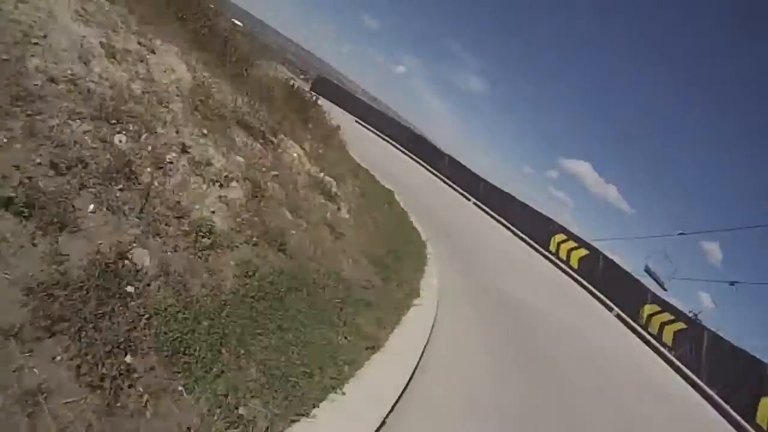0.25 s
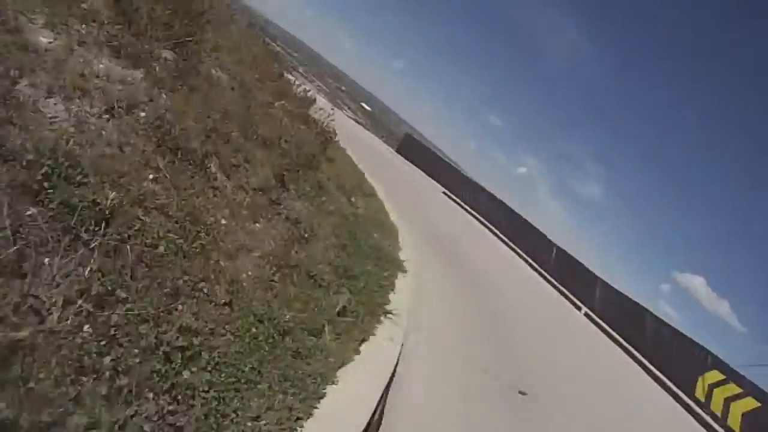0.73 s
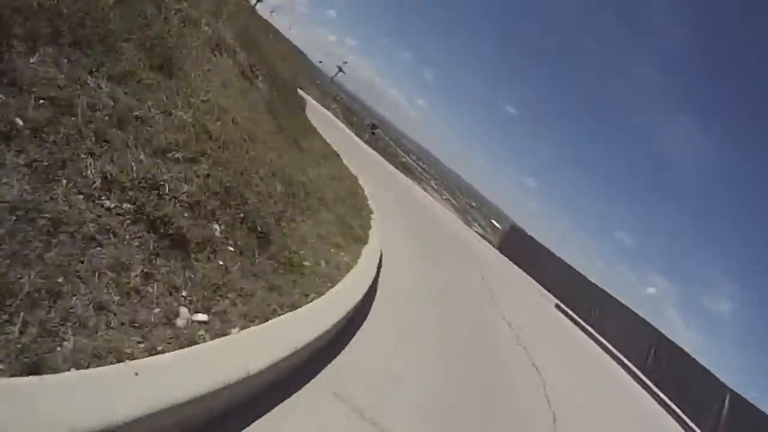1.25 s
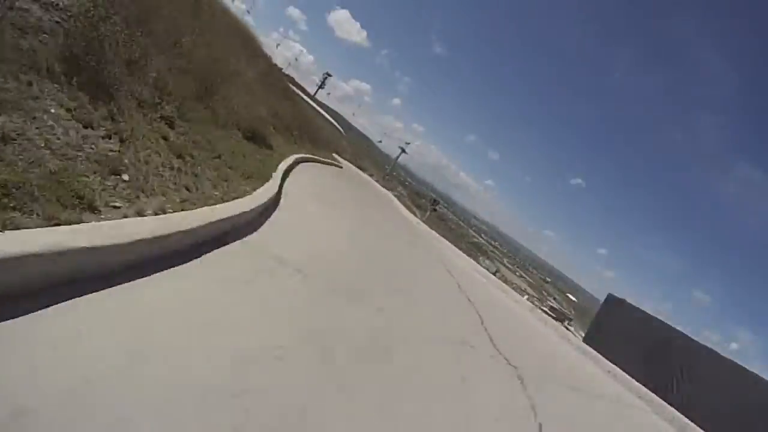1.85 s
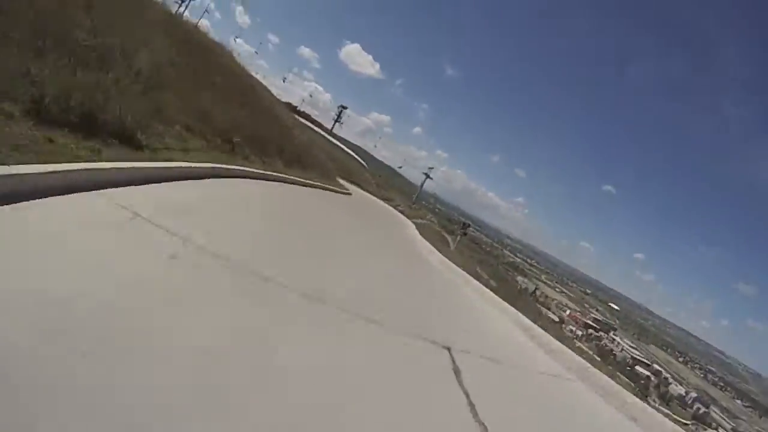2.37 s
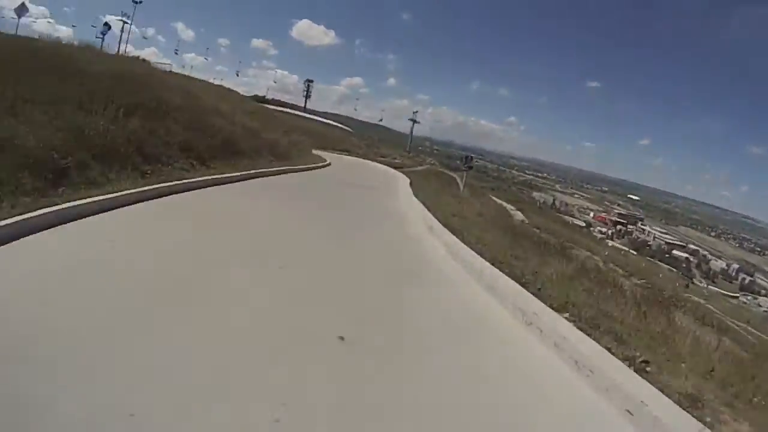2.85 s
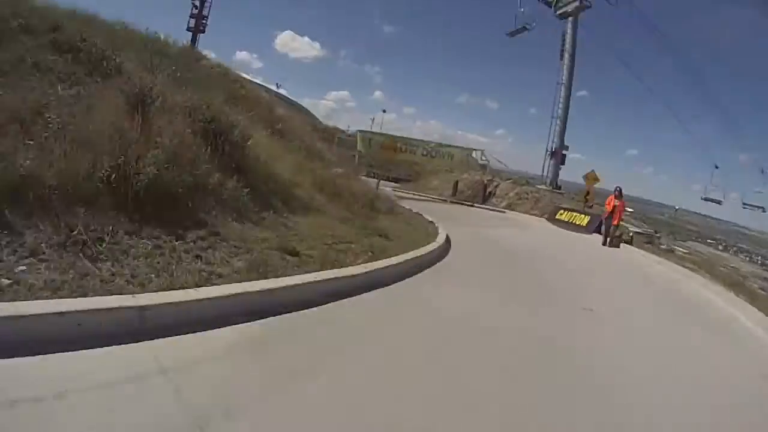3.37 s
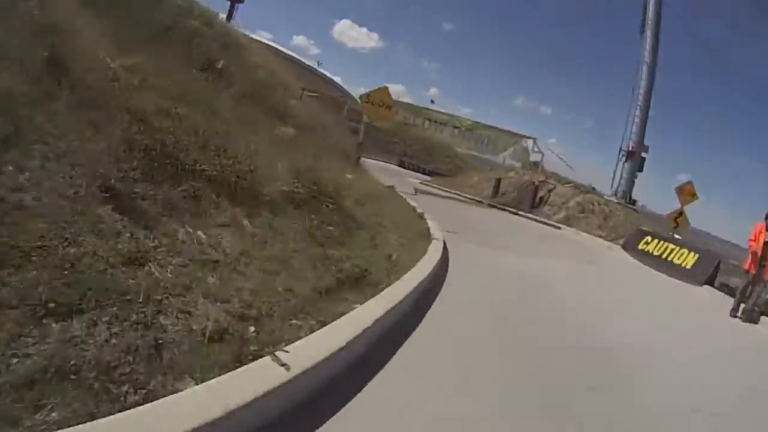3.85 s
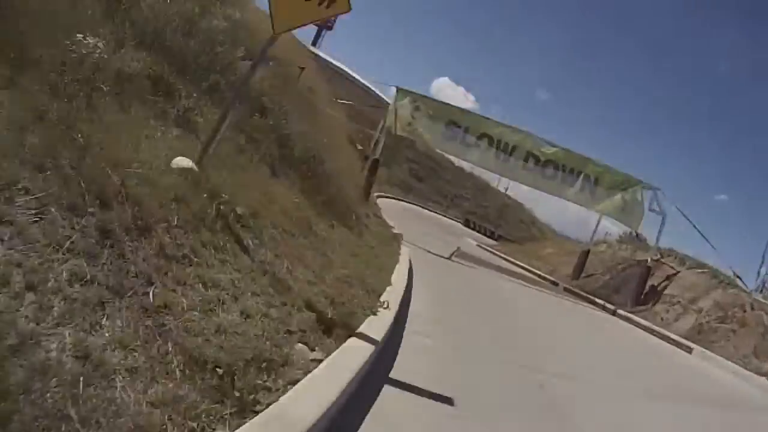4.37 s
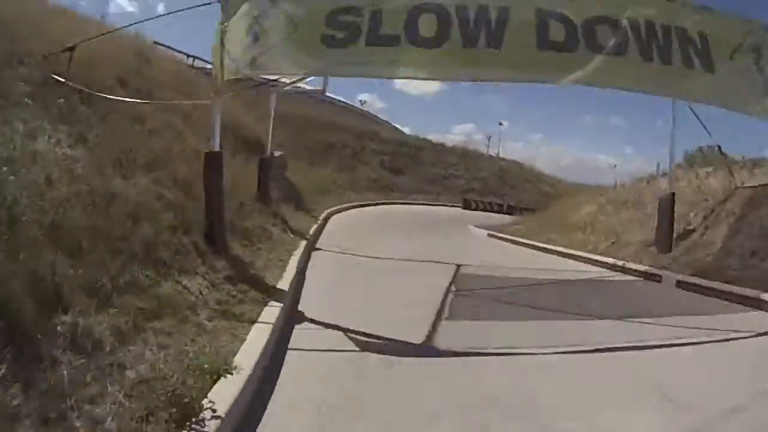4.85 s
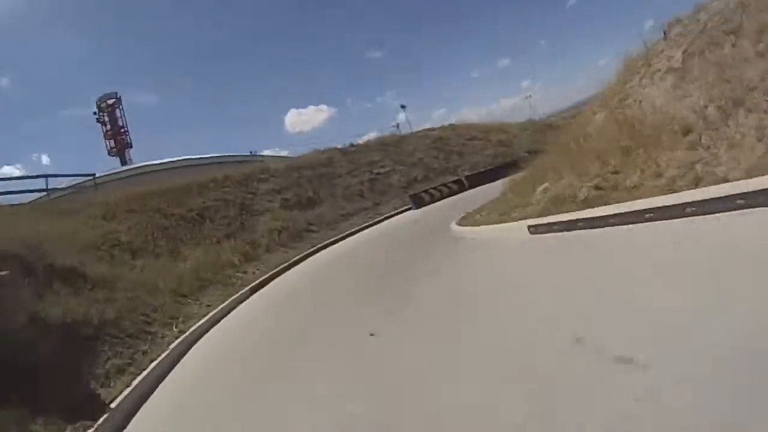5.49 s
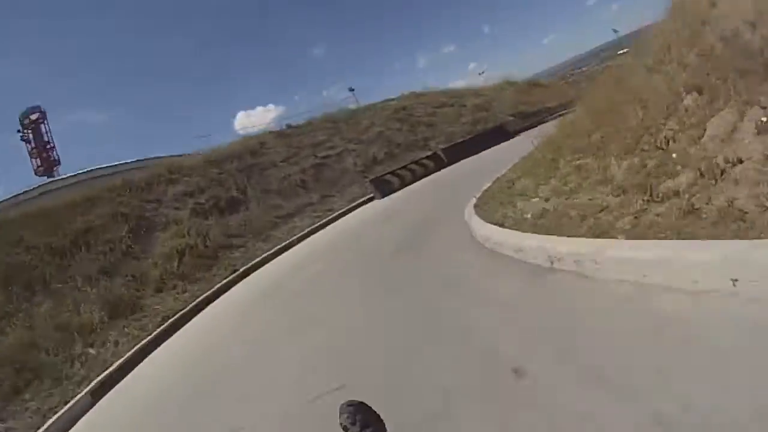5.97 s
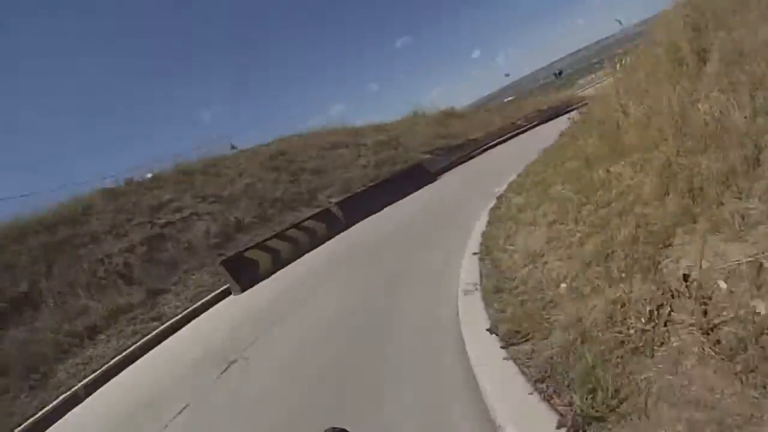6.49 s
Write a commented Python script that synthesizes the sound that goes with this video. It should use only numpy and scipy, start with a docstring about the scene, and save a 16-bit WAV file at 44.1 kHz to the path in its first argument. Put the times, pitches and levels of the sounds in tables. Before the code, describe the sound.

Loud wheeled sled rumble on a concrete track, with knocks, rattles and wind buffeting, turning to a rasping howl and squeal.

```python
"""Plastic sled on a concrete track

A sled on small wheels runs fast downhill, heard from the rider's seat. Rough concrete drums the
wheels and makes the hollow shell boom. Grit crackles and pings the metal parts, cracks jolt the
sled, and wind buffets the microphone. From about 5 s the sled slows for a corner, scrubbing over
the concrete in several pushes that rasp, howl and finally squeal."""
import sys
import numpy as np
from scipy import signal
from scipy.fft import rfft, irfft, next_fast_len
from scipy.io import wavfile
from scipy.ndimage import uniform_filter1d, map_coordinates

SR = 44100
rng = np.random.default_rng(int(sys.argv[2]) if len(sys.argv) > 2 else 0)


def wav_out(sig):
    """Save sig, one row per channel (or a flat mono array), as 16-bit PCM at SR to the path in sys.argv[1]."""
    wavfile.write(sys.argv[1], SR, np.round(np.clip(np.atleast_2d(sig).T, -1, 1) * 32767).astype(np.int16))


N = 296784

# How hard the track drums the wheels. Each row: time in seconds, relative level in dB.
ROAR_LEVEL = [(0.0, -16), (0.8, -16.0), (1.0, -17.5), (1.54, -15.5), (1.76, -18.5), (1.92, -14), (2.0, -20),
              (2.26, -15), (2.48, -20), (2.88, -14), (3.1, -18.0), (3.44, -13.5), (3.5, -18), (3.7, -13.5),
              (3.82, -20), (3.9, -17), (4.6, -16), (4.83, -21.5), (4.93, -16.5), (5.0, -14), (5.94, -15),
              (6.0, -18), (6.72, -14.5)]
# Rough stretches of concrete. Each row: start in seconds, length in seconds, boost in dB.
ROUGH_PATCHES = [(0.145, 0.025, 3), (0.608, 0.1, 2.5), (1.438, 0.047, 2.5), (2.823, 0.079, 1.86),
                 (3.875, 0.045, 3.5), (4.15, .05, 2.5), (4.566, 0.054, 3), (4.954, .075, 3),
                 (5.128, .11, 3), (5.858, 0.035, 3.5), (6.294, 0.039, 4.5)]
# The tone of the rolling wheels and of the rattling fittings. Each row: frequency in Hz, gain in dB.
ROAR_COLOUR = [(110, -18.5), (240, -2.5), (350, -5.5), (450, -1.5), (540, -3), (640, 0.5), (770, -2.5),
               (880, -10), (1050, -23.5), (1400, -30.5), (2200, -42), (2600, -51.5), (5000, -72),
               (9000, -105)]
RATTLE_COLOUR = [(500, -17), (1000, 8.5), (1250, 3), (1470, 4.5), (1630, -7), (1800, 0.5), (1950, -5),
                 (2200, -0.5), (2550, -20), (2740, -9), (2920, -24), (3110, -16.5), (3500, -24.5),
                 (6000, -42.5), (10000, -70)]
# The notes the hollow shell rings at. Each row: pitch in Hz, width in Hz, gain in dB.
SHELL_MODES = [(158, 18, -4), (178, 20, 0), (222, 36, -9), (288, 50, -13)]
# How strongly the shell booms. Each row: time in seconds, level in dB.
BOOM_LEVEL = [(0, -15), (0.15, -16.5), (0.82, -17.5), (1.35, -20), (1.6, -24), (1.72, -19), (2.0, -27),
              (2.12, -19.5), (2.55, -28), (2.72, -14.5), (3.08, -17.5), (3.2, -19), (3.85, -23),
              (3.94, -14.5), (4.05, -22), (4.6, -18), (4.7, -22.5), (5.2, -26.5), (5.62, -32),
              (5.72, -25.5), (6.0, -28.5), (6.2, -23.5), (6.72, -22)]
# The boom's higher tone. Each row: frequency in Hz, gain in dB.
HIGH_BOOM_COLOUR = [(120, -6), (165, -2.5), (215, 2.5), (290, 2.5)]
# How much of that tone is used. Each row: time in seconds, share from 0 to 1.
HIGH_BOOM_SHARE = [(0.6, 0.59), (1.7, .1), (3.1, 0.053), (3.5, 0.72), (4.5, .55), (5.0, 0.8)]

# Hard scrubbing pushes, the light drag between them, and the bursts of squeal.
# Each row: start in seconds, length in seconds, relative level in dB.
SCRUB_PUSHES = [(4.965, 0.032, -37.5), (5.07, 0.23, -41.3), (5.35, 0.32, -36.5), (5.76, 0.1, -48),
                (5.86, 0.34, -41), (6.37, 0.66, -39.5), (6.46, 0.061, -39)]
LIGHT_DRAG = [(5.0, 1.1, -44.5)]
SQUEAL_BURSTS = [(5.93, .07, -42), (6.1, .08, -46), (6.43, .3, -37.5), (6.46, .045, -35)]
# The tone of the rasp and of the hiss drawn from it. Each row: frequency in Hz, gain in dB.
RASP_COLOUR = [(400, -20.5), (800, 21.5), (1100, 10.5), (1450, -2), (1700, -1), (2250, -1), (2500, -5),
               (3600, -10.5), (4050, -15), (4600, -15.5), (5600, -19), (6900, -29), (8100, -27.5),
               (8800, -47), (9700, -37), (14000, -50)]
HISS_COLOUR = [(1500, -18.5), (3300, -2.5), (5500, -5.5), (8000, -16)]
# The notes of slipping wheels. Each row: pitch in Hz, relative level in dB.
CHIRP_MODES = [(1480, -17.5), (1800, -21), (2220, -18.5)]
# The wandering notes of the howl and the squeal. Each row: time in seconds, pitch in Hz.
HOWL_NOTES = [(5.0, 680.5), (5.2, 750), (5.5, 780.7), (5.6, 713.4), (5.9, 703), (6.1, 729.5), (6.44, 726),
              (6.51, 689.4), (6.6, 725), (6.72, 677)]
SQUEAL_NOTES = [(6.0, 2270), (6.11, 2390), (6.17, 2170), (6.46, 2160), (6.51, 1950), (6.58, 1970),
                (6.63, 2080), (6.7, 1960), (6.73, 2000)]

# Cracks and joints under the wheels. Each row: time in seconds, kick in dB, clack strength in dB.
TRACK_CRACKS = [(0.14, 3.5, -33), (0.209, 4.5, -31), (0.429, 6.5, -46), (0.634, -0.5, -44),
                (0.829, 6.5, -39), (1.252, 1.5, -43), (1.346, 4, -45), (1.503, 6, -44), (1.546, 4.5, -39),
                (1.645, 7.5, -43), (1.821, 4.5, -38.5), (1.919, 6.5, -42), (2.228, 1.5, -33),
                (2.384, 2, -42), (2.56, 5, -34), (2.682, 2, -39.5), (2.947, 4.5, -42), (3.139, 5.5, -38),
                (3.367, 5, -45), (3.524, 6.5, -48), (3.668, 4, -48), (3.731, 2.5, -42), (4.333, 4, -37),
                (4.552, 5.5, -31.5), (4.723, 7.5, -43), (5.251, 6.5, -36), (5.288, 7, -39),
                (5.681, 3.5, -32), (5.81, 3.5, -34), (5.862, 2.5, -38), (6.693, 1, -37)]
# The tone of a landing's knock, the fittings' clack and a thump. Each row: frequency in Hz, gain in dB.
KNOCK_COLOUR = [(130, -21), (300, -7.5), (620, 1), (790, 0.5), (1050, -24), (2500, -59.5), (6000, -95.5)]
CLACK_COLOUR = [(600, -12.5), (1100, 16), (1500, 14.5), (2250, 3.5), (2600, -4), (5000, -15.5), (9000, -40)]
THUMP_COLOUR = [(20, -8.5), (60, 4), (270, 0.5), (450, -11), (1500, -54), (6000, -110)]
# Dull thumps: steps between slabs, and one more that comes with the dry tick at 3.2 s. Each row: time in
# seconds, peak level in dB.
DULL_THUMPS = [(2.243, -14.5), (3.196, -9), (4.925, -13), (5.075, -2.5)]
# Small crests where the sled goes light. Each row: time in seconds, level change in dB.
CREST_DIPS = [(0.4, -3), (0.99, -3.5), (1.284, -4), (2.2, -3), (2.33, -0.5), (3.81, 0), (4.665, -4),
              (5.1, -0.5), (5.323, -5.5), (6.58, -3)]

# Sand under the wheels. Each row: time in seconds, relative level in dB.
SAND_LEVEL = [(0, -51), (0.17, -54), (0.3, -54.5), (0.78, -57), (1.0, -56.5), (1.9, -59), (2.48, -63),
              (2.8, -60.5), (3.8, -60.5), (4.3, -56.5), (4.6, -55), (4.76, -62), (4.92, -62)]
# Little heaps of sand. Each row: start in seconds, length in seconds, boost in dB.
SAND_HEAPS = [(0.072, .008, 1), (0.145, 0.04, 3.5), (0.325, 0.017, 3.5), (0.374, .006, 4), (0.6, .025, 2.5),
              (0.685, .025, 2.5), (0.753, 0.013, 6), (1.062, .045, 4), (1.303, 0.012, 5.5),
              (1.413, 0.049, 2.5), (1.837, 0.054, 3.5), (2.555, .012, 5), (3.67, .008, 5), (3.9, 0.05, 4),
              (4.087, .008, 1), (4.16, 0.023, 5), (4.34, .015, 2), (4.609, 0.0072, 2), (4.883, .004, 7)]
# The tone of coarse grit and of the finest sand. Each row: frequency in Hz, gain in dB.
GRIT_COLOUR = [(1500, -17), (2500, -7.5), (3050, -2), (3600, -9), (4350, 5), (5300, 0), (6650, -2),
               (7200, -11.5), (8150, -9), (8750, -24.5), (11400, -32), (15000, -50.5)]
FIZZ_COLOUR = [(5000, -34.5), (8750, -4), (9400, -2), (11400, -2), (12500, -6), (13600, -7), (15000, -18.5)]
# The notes of the metal parts. Each row: pitch in Hz, seconds to fade by 60 dB, relative level in dB.
METAL_MODES = [(4450, .03, 0), (5150, .02, -2), (5800, .06, -4), (6600, .028, -1), (8170, .04, -7),
               (13400, .02, -14)]
# Hard grains hitting the metal. Each row: time in seconds, strength in dB, pitch in Hz.
GRAIN_PINGS = [(0.0233, -38, 5670), (0.0732, -38, 5790), (0.1585, -30, 6320), (0.2084, -38, 6440),
               (0.341, -35, 5560), (0.5985, -35, 5770), (0.7547, -39, 6160), (0.82, -37, 6750),
               (1.0705, -32, 5820), (1.2979, -41, 5810), (1.485, -38, 6640), (1.7973, -45, 6600),
               (2.3645, -43, 6800), (2.5461, -48, 6350), (4.0871, -46, 6200), (4.2782, -31, 5830),
               (4.361, -36, 5850), (4.4727, -36, 5840), (4.554, -32, 6640)]

# Steady air over the microphone. Each row: time in seconds, relative level in dB.
WIND_LEVEL = [(0, -26.5), (1.15, -35.5), (1.7, -33), (2.6, -28.5), (3.1, -39.5), (3.25, -26.5), (4.0, -29),
              (5.45, -30.5), (6.0, -32), (6.72, -28.5)]
# Wind gusts and a faint sizzle. Each row: start in seconds, length in seconds, relative level in dB.
WIND_GUSTS = [(0.05, 0.052, -27), (1.72, 0.05, -25), (1.85, 0.036, -22.5), (2.21, .08, -24),
              (2.43, .08, -30.5), (3.16, 0.095, -24.5), (4.3, 0.24, -25), (4.8, 0.21, -24.5),
              (5.0, 0.23, -29.5), (5.67, 0.19, -25.5)]
SIZZLE_BURSTS = [(2.72, .33, -62.5)]
# One dry tick. Its row: time in seconds, strength in dB.
DRY_TICK = [(3.1912, -22)]


def wheel_roar(load, jolt):
    """Rough concrete drums the wheels with tiny hits; they drum less once they slide."""
    slide_db, = curves([(4.7, 0), (4.86, -2.95)])
    hits = contacts(rate=2600, spread_db=1.5, smooth=0.68) * amp(1.33 * load + jolt)
    return amp(roar_level() + 0.5 + slide_db) * unit(coloured(hits, ROAR_COLOUR))


def rattle(load, jolt):
    """The fittings shake, louder where the track is rough or sandy."""
    ticks = contacts(rate=500, spread_db=2.5, smooth=.4)
    ticks *= amp(1.8 * load + 1.4 * chatter(rate=90, fade_s=.04) + .45 * jolt)
    return amp(0.63 * roar_level() + 0.43 * sand_level() - 5.5) * unit(coloured(ticks, RATTLE_COLOUR))


def shell_boom(load):
    """Hits from the track make the hollow shell ring, its tone shifting higher at times."""
    shell = resonate(contacts(rate=890, spread_db=1, smooth=0.68) * amp(load), SHELL_MODES)
    boom = unit(coloured(shell, [(90, -16), (150, 0.5), (300, 1), (700, -15), (2000, -49.5)]))
    boom_db, = curves(BOOM_LEVEL)
    high_share, = curves(HIGH_BOOM_SHARE)
    return amp(boom_db) * ((1 - high_share) * boom + high_share * coloured(boom, HIGH_BOOM_COLOUR))


def scrub(load, pressure):
    """Sliding rasps on the concrete and makes the wheels chirp; harder pushes hiss brighter."""
    scrapes = contacts(rate=4300, spread_db=5, smooth=0.49) * amp(1.1 * load + 2.1 * wobble(110))
    rasp = unit(coloured(scrapes, RASP_COLOUR))
    full_push = amp(-38)
    hiss = amp(-42) * (pressure / full_push) ** 2 * unit(coloured(rasp, HISS_COLOUR))
    chirps = 0
    for hz, db in CHIRP_MODES:
        tone = friction_tone(hz * (1 + 0.035 * wobble(16)), scatter_hz=99.2, flutter_db=2.5)
        chirps += amp(db) * tone * amp(1.3 * wobble(25))
    return amp(13) * pressure * (rasp + chirps) + hiss


def howl(pressure):
    """Rapid sticking and slipping makes a hoarse note that grows gently with the pressure."""
    hz, = curves(HOWL_NOTES)
    tone = friction_tone(hz * (1 + .012 * wobble(25)), scatter_hz=38, flutter_db=2.5)
    return amp(-5.5) * pressure ** 0.41 * tone


def squeal():
    """The slipping wheels squeal in thin bursts, with a softer note an octave above the howl."""
    squeal_hz, = curves(SQUEAL_NOTES)
    howl_hz, = curves(HOWL_NOTES)
    whine = friction_tone(squeal_hz, scatter_hz=75, flutter_db=3)
    octave = friction_tone(2 * howl_hz, scatter_hz=75, flutter_db=3)
    return (whine + amp(-6) * octave) * swells(SQUEAL_BURSTS, attack_s=0.04, release_db_per_s=403)


def knocks(clack_decay_s=0.018):
    """Landing after a crack knocks the wheels, harder where they roar, and clacks the fittings."""
    s, kick_db, clack_db = np.transpose(TRACK_CRACKS)
    roar_db, = curves(ROAR_LEVEL)
    knock = coloured(impulses(s, 35.5 + kick_db) * amp(roar_db), KNOCK_COLOUR)
    fade = np.exp(-np.arange(SR // 8) / SR / clack_decay_s)
    shake = signal.fftconvolve(impulses(s, clack_db), fade)[:N]
    return knock + coloured(shake * rng.standard_normal(N), CLACK_COLOUR)


def thumps():
    """Each step between slabs gives the whole sled one dull push; one more dull push comes with the dry tick at
    3.2 s."""
    s, peak_db = np.transpose(DULL_THUMPS)
    push = coloured(impulses(s, peak_db), THUMP_COLOUR)
    return amp(peak_db.max()) * push / np.abs(push).max()


def grit(load, jolt):
    """Sand grains crack under the wheels, hardest at each landing."""
    sand_db = sand_level()
    pressure = amp(1.3 * load + 2.3 * chatter(rate=60, fade_s=.035) + .4 * jolt)
    coarse = contacts(rate=2300, spread_db=2.5, smooth=0.49) * pressure
    fine = contacts(rate=1500, spread_db=-1, smooth=.5) * pressure * amp(1.8 * wobble(90))
    crackle = amp(sand_db + 4) * unit(coloured(coarse, GRIT_COLOUR))
    # The fizz needs the hardest contact, so it swells faster than the crackle.
    fizz = amp(1.575 * sand_db + 21) * unit(coloured(fine, FIZZ_COLOUR))
    return crackle + fizz


def metal_pings(ticks_per_s=16):
    """Flying grains hit the metal: a few hard pings, and light ticks that grow louder with more sand."""
    s, strength_db, hz = np.transpose(GRAIN_PINGS)
    pings = grain_hits(s, strength_db - 6.5, hz)
    sand_db = sand_level()
    for mode_hz, _, mode_db in METAL_MODES:
        at = rng.integers(0, N, int(ticks_per_s * N / SR))
        size, detune = rng.standard_normal((len(at), 2)).clip(-2, 2).T
        tick_db = sand_db[at] + 5.2 + mode_db + 2.5 * size
        pings += grain_hits(at / SR, tick_db, mode_hz * (1 + .015 * detune))
    return pings


def grain_hits(s, db, hz, attack_s=.0006, crack_decay_s=.004):
    """Each grain gives a dry crack and briefly rings two close metal notes that beat together."""
    mode_hz, mode_fade_s, _ = np.transpose(METAL_MODES)
    t = np.arange(SR // 12) / SR
    detune = rng.uniform(.005, .04, (len(s), 1))
    phase = 2 * np.pi * hz[:, None] * t
    fade_s = np.interp(hz, mode_hz, mode_fade_s)[:, None]
    envelope = amp(-60 * t / fade_s) * (1 - np.exp(-t / attack_s))
    rings = envelope * (np.sin(phase) + .5 * np.sin(phase * (1 - detune)))
    cracks = amp(1.5) * np.exp(-t / crack_decay_s) * rng.standard_normal(phase.shape)
    # Add every hit in at its own start time.
    at = (np.round(s * SR).astype(int)[:, None] + np.arange(len(t))).ravel()
    ring, crack = (np.bincount(at, (amp(db)[:, None] * part).ravel(), N)[:N] for part in (rings, cracks))
    return ring + coloured(crack, GRIT_COLOUR)


def wind():
    """Air tumbles over the microphone in lumps, making a low rumble."""
    steady_db, = curves(WIND_LEVEL)
    colour = [(8, -20), (20, -2.5), (35, 5.5), (70, 3), (120, 3), (250, 0), (800, -70)]
    rumble = unit(coloured(rng.standard_normal(N), colour) * amp(0.55 * wobble(11)))
    gusts = swells(WIND_GUSTS, attack_s=0.057, release_db_per_s=202)
    return amp(1.93) * np.hypot(amp(steady_db), gusts) * rumble


def sizzle_and_tick():
    """A thin, high sizzle on the straight, and a dry tick at 3.2 s."""
    hiss = resonate(rng.standard_normal(N), [(7600, 280, 0.015), (8220, 240, 0.92)])
    sizzle = unit(resonate(hiss, [(7840, 720, 0)]) * amp(2 * wobble(30)))
    tick = coloured(impulses(*np.transpose(DRY_TICK)), [(1000, 6), (4000, 2), (15000, -4)])
    return swells(SIZZLE_BURSTS, attack_s=.15, release_db_per_s=90) * sizzle + tick


def roar_level():
    """How hard the track drums, in dB, rough patches included."""
    return curves(ROAR_LEVEL)[0] + boosts(ROUGH_PATCHES, attack_s=0.01, release_db_per_s=502.5)


def sand_level():
    """How gritty the track is, in dB, heaps included."""
    return curves(SAND_LEVEL)[0] + boosts(SAND_HEAPS, attack_s=0.002, release_db_per_s=700.5)


def chatter(rate, fade_s):
    """A wheel skips over ripples: its load leaps at each landing, then relaxes."""
    landings = (rng.random(N) < rate / SR) * rng.uniform(0.23, 1, N)
    load = signal.fftconvolve(landings, amp(-60 * np.arange(SR // 8) / SR / fade_s))[:N]
    swing = unit(load - uniform_filter1d(load, size=SR // 12))
    return 2 * np.tanh(swing / 2)


def jolt_db(hang_s=.011, kick_s=.008):
    """A wheel hangs over each crack for an instant, then lands with a kick that dies away."""
    t = np.arange(-SR // 20, SR // 5) / SR
    shape = np.where(t < 0, -1.05 * np.exp(-np.abs(t) / hang_s), np.exp(-np.abs(t) / kick_s))
    db = np.zeros(N + SR)
    for s, kick_db, _ in TRACK_CRACKS:
        db[round(s * SR) - SR // 20:][:len(t)] += kick_db * shape
    return db[:N]


def crest_gain(half_length_s=0.025):
    """A volume curve that dips as the sled floats over each crest."""
    t = np.arange(N) / SR
    return amp(sum(db * np.exp(-((t - s) / half_length_s) ** 2) for s, db in CREST_DIPS))


def contacts(rate, spread_db, smooth):
    """Tiny hits of uneven size, `rate` a second, plus a `smooth` amount of plain noise."""
    struck = rng.random(N) < rate / SR
    sizes = rng.choice([-1, 1], N) * amp(spread_db * rng.standard_normal(N).clip(-2, 2))
    return unit(unit(struck * sizes) + smooth * rng.standard_normal(N))


def friction_tone(hz, scatter_hz, flutter_db):
    """A rubbing note whose pitch and strength tremble."""
    phase = 2 * np.pi * np.cumsum(hz + scatter_hz * wobble(300)) / SR
    return unit(np.sin(phase) * amp(flutter_db * wobble(160)))


def swells(rows, attack_s, release_db_per_s):
    """A volume curve from (start, length, dB) rows: each eases in, holds and dies away."""
    t = np.arange(N) / SR
    gains = []
    for s, length, db in rows:
        rise = np.sin(np.pi / 2 * np.clip((t - s) / attack_s, 0, 1)) ** 2
        gains.append(rise * amp(db - release_db_per_s * np.maximum(t - s - length, 0)))
    return np.linalg.norm(gains, axis=0)


def boosts(rows, attack_s, release_db_per_s):
    """Extra dB from (start, length, dB) rows, each swelling and fading."""
    return sum(db * swells([(s, length, 0)], attack_s, release_db_per_s) for s, length, db in rows)


def impulses(times, db):
    """One sharp blow at each time."""
    return np.bincount(np.round(times * SR).astype(int), amp(db), N)[:N]


def coloured(x, points):
    """Shape the tone of x with (Hz, dB) gains."""
    size = 2 * next_fast_len(N // 2 + SR // 4)
    hz, db = np.transpose(points)
    log_gain = np.log(amp(np.interp(np.log(np.fft.rfftfreq(size, 1 / SR) + 1), np.log(hz), db)))
    # Fold the filter so that it rings only after a hit, never before.
    cepstrum = irfft(log_gain, size)
    cepstrum[1:size // 2] *= 2
    cepstrum[size // 2 + 1:] = 0
    return irfft(rfft(x, size) * np.exp(rfft(cepstrum)), size)[:N]


def resonate(x, modes):
    """Let x ring at each (Hz, width in Hz, dB) note."""
    size = next_fast_len(N + SR // 2)
    f = np.fft.rfftfreq(size, 1 / SR)
    response = sum((-1) ** k * amp(db) * 1j * f * width / (hz * hz - f * f + 1j * f * width)
                   for k, (hz, width, db) in enumerate(modes))
    return irfft(rfft(x, size) * response, size)[:N]


def wobble(rate):
    """A smooth curve through `rate` random points a second."""
    return map_coordinates(rng.standard_normal(4096), [np.arange(N) * rate / SR], mode="wrap")


def curves(rows):
    """One value per sample for each column after the time."""
    s, *columns = np.transpose(rows)
    return [np.interp(np.arange(N) / SR, s, column) for column in columns]


def amp(db):
    """Turn dB into a multiplier."""
    return 10 ** (np.asarray(db) / 20)


def unit(x):
    """Scale x to an average (rms) strength of 1."""
    return x / np.sqrt(np.mean(x ** 2) + 1e-20)


def scene():
    """Mix the sled and the wind in mono; one wheel load shakes the rolling, grit and rasp together."""
    load = chatter(rate=130, fade_s=0.054) + 0.32 * wobble(30)
    jolt = jolt_db()
    pressure = swells(SCRUB_PUSHES + LIGHT_DRAG, attack_s=0.054, release_db_per_s=94)
    rolling = wheel_roar(load, jolt) + rattle(load, jolt) + shell_boom(load)
    hits = grit(load, jolt) + metal_pings() + knocks()
    sliding = scrub(load, pressure) + howl(pressure) + squeal()
    return (crest_gain() * (rolling + hits + sliding) + thumps() + wind() + sizzle_and_tick())[None]


def record(dry):
    """Round off the highest peaks and cut the very top of the treble."""
    ceiling, top_hz = 1.2, 15100
    rounded = dry / (1 + np.abs(dry / ceiling) ** 8) ** (1 / 8)
    return signal.sosfiltfilt(signal.cheby1(12, .05, top_hz, fs=SR, output="sos"), rounded)


dry = scene()
out = record(dry)
wav_out(out)
```